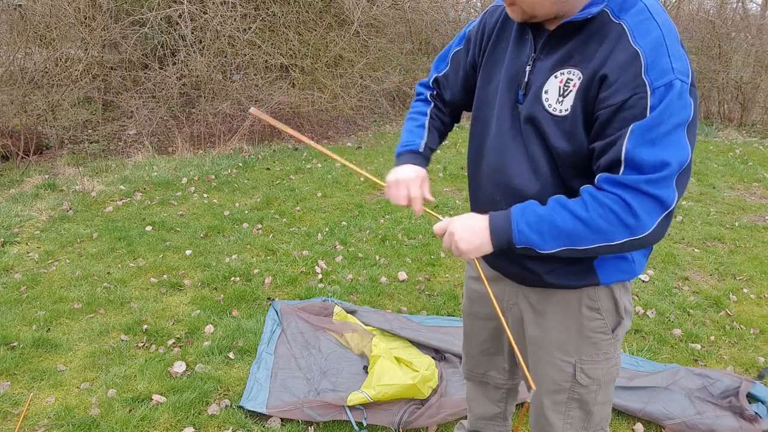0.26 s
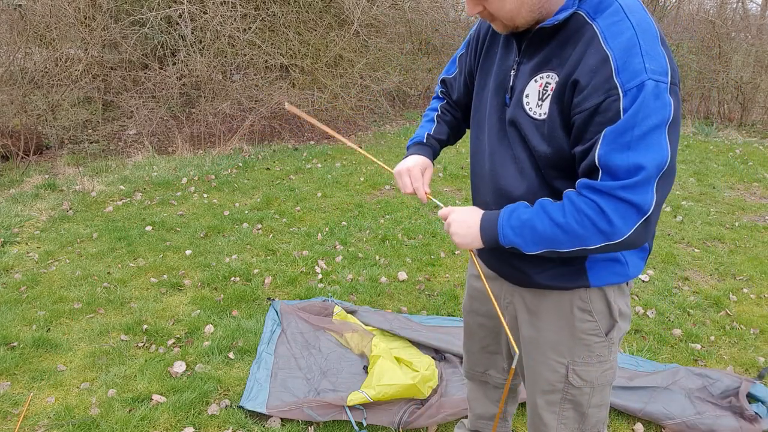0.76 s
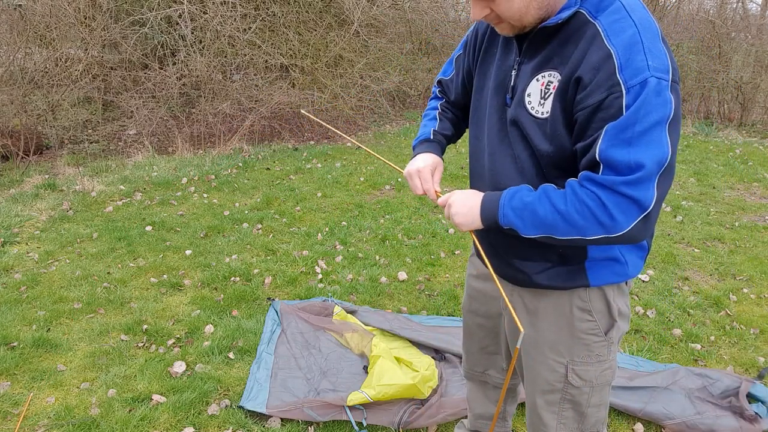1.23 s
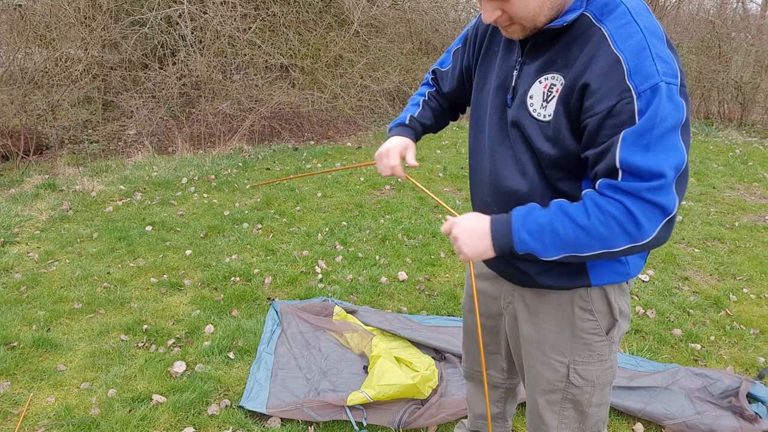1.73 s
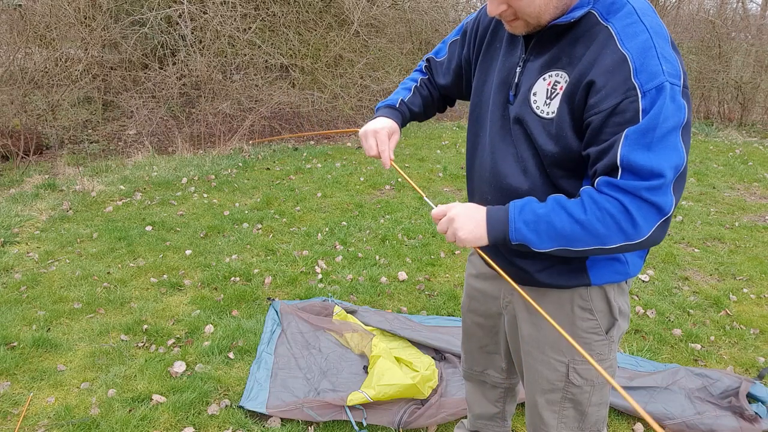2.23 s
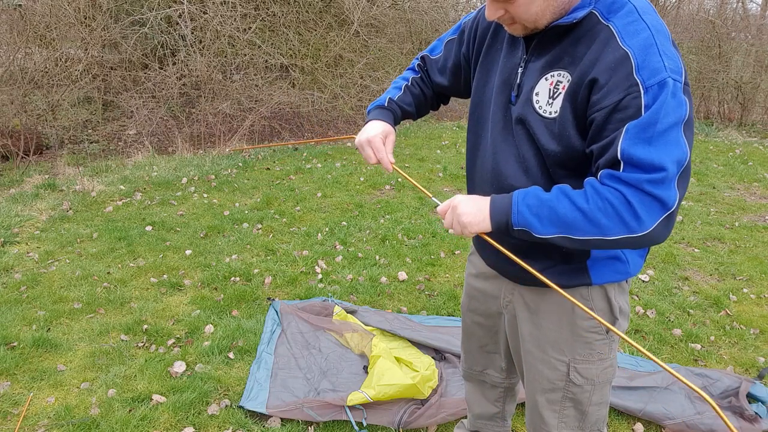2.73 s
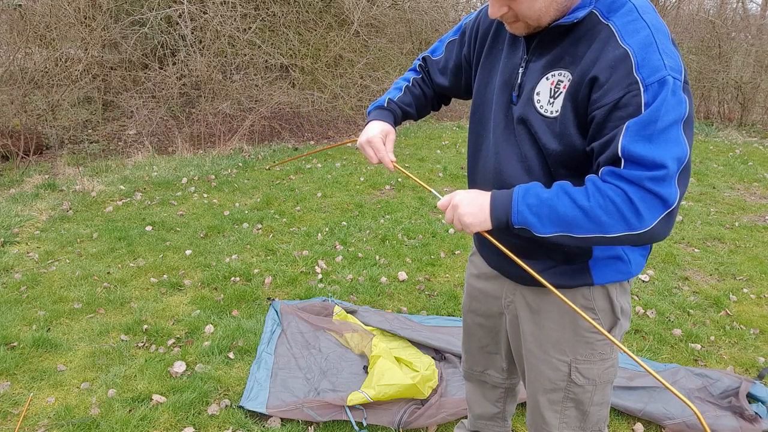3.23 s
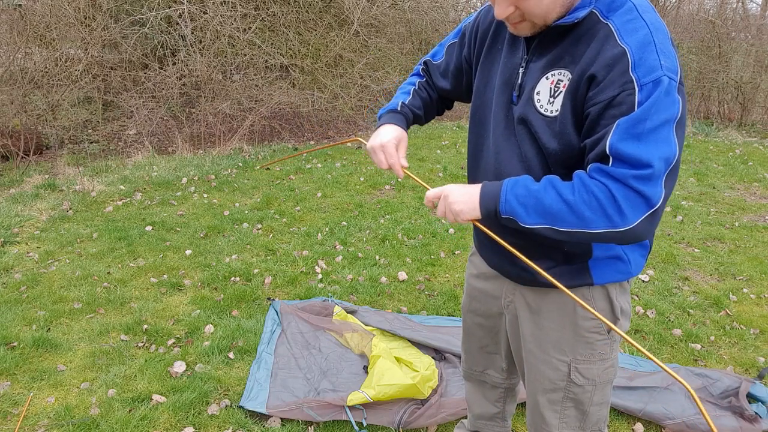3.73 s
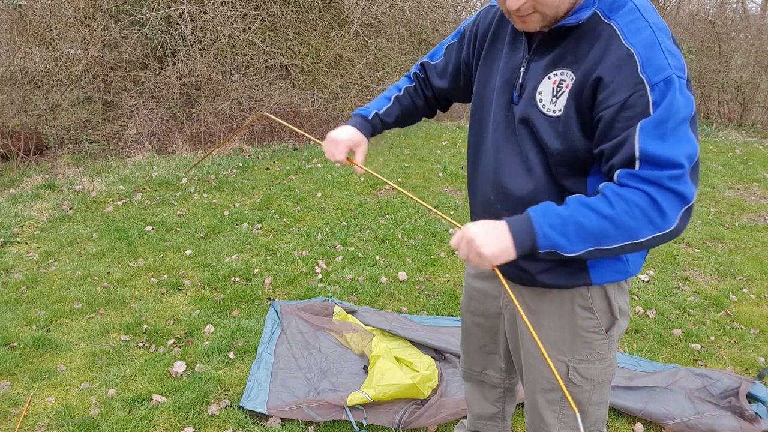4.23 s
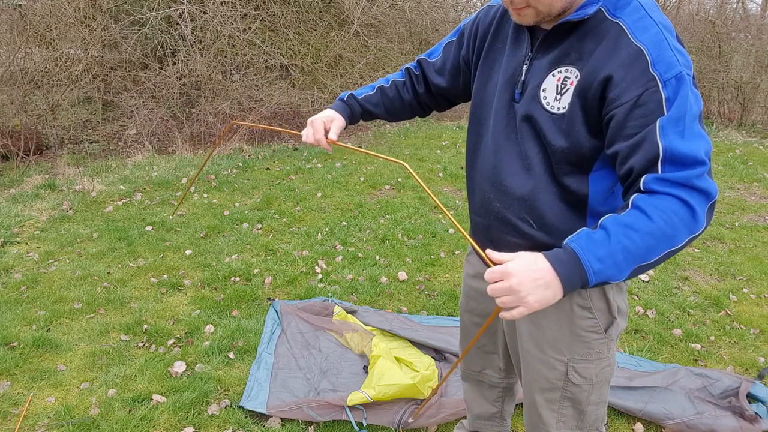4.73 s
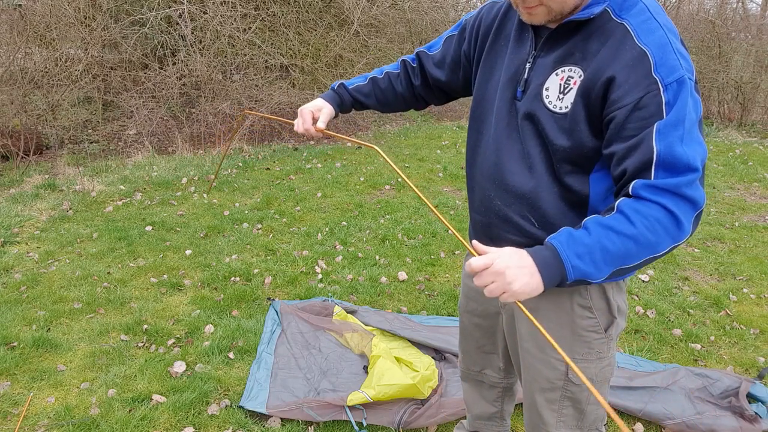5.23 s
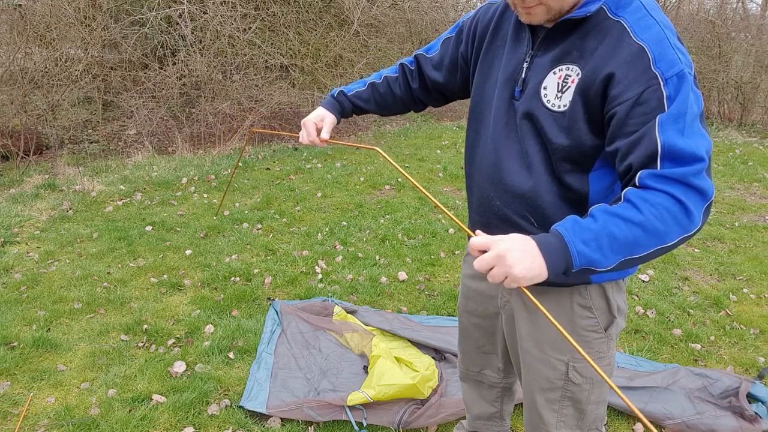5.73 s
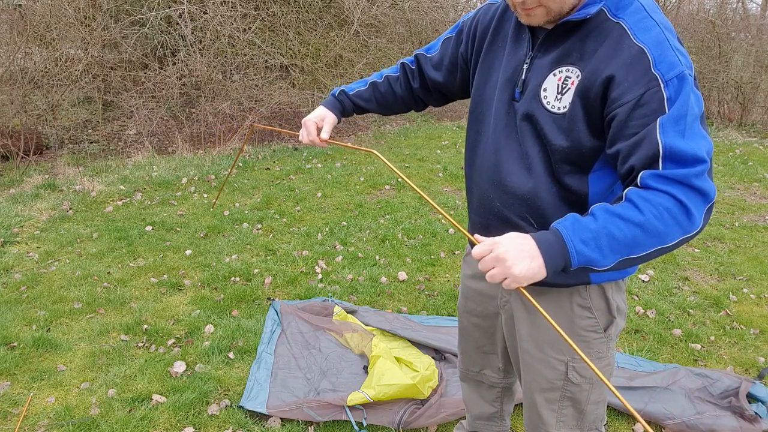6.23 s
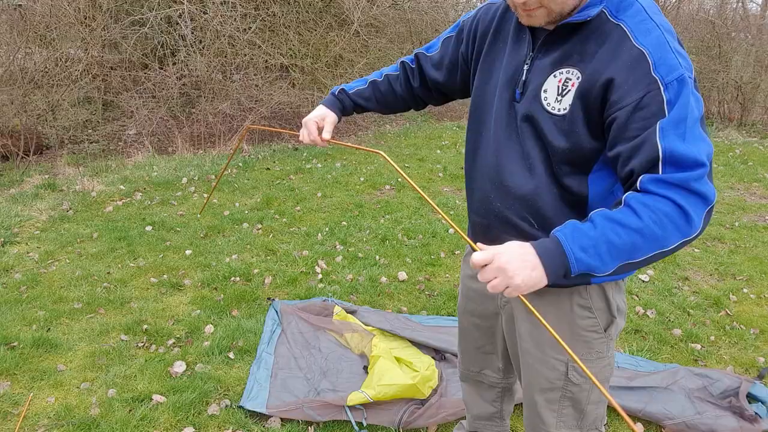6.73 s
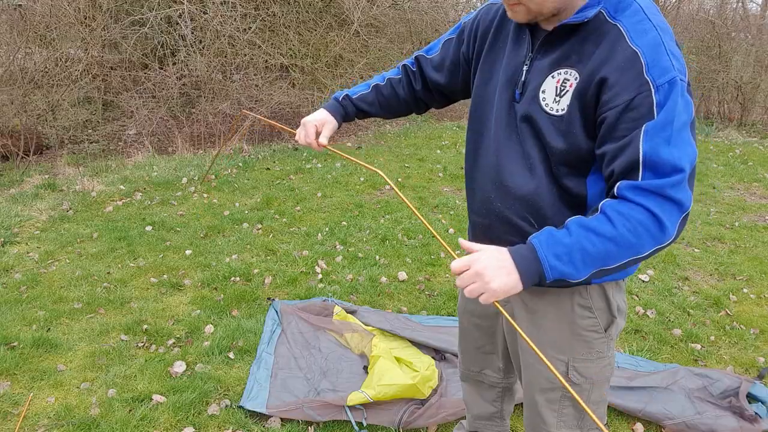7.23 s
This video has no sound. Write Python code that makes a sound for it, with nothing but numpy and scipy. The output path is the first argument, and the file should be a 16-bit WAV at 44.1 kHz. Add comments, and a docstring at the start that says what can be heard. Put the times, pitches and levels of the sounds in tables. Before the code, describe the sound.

On an open lawn beside a hedge, someone slides slim metal tubes together. A sharp early snap leads a flurry of dry ticks and small rattles, followed by isolated taps, a quieter middle and late final clicks. Grainy cloth rustle accompanies the movements. Faint birds chirp and trill behind, with a soft low traffic hum. Close stereo pickup, airy and mostly quiet.

```python
"""Tent pole on a lawn

Sections of a thin aluminium tent pole are slid together: ferrules click, tap and scrape as noise bursts
through short tube modes, each answered by echoes from the lawn and the hedge. Songbirds whistle, buzz and
trill, and others chirp far off, all as gliding sines. Sleeves rustle as grainy hiss, and distant traffic
hums as patchy shaped noise with faint tones. The two microphone ports have different treble resonances."""
import sys
import numpy as np
from scipy import signal
from scipy.fft import rfft, irfft, next_fast_len
from scipy.io import wavfile
from scipy.ndimage import uniform_filter1d, map_coordinates

SR = 44100
rng = np.random.default_rng(int(sys.argv[2]) if len(sys.argv) > 2 else 0)


def master_out(mix):
    """Clip the mix to full scale and print it as 16-bit PCM to the path in sys.argv[1]."""
    frames = np.transpose(np.atleast_2d(mix))
    ceiling = np.clip(frames, -1, 1)
    pcm = np.round(ceiling * 32767).astype(np.int16)
    wavfile.write(sys.argv[1], SR, pcm)


N = 330309


def amp(db):
    """Turn dB into an amplitude factor."""
    return 10 ** (np.asarray(db) / 20)


def unit(x):
    """Scale a sound to an RMS level of 1."""
    return x / np.sqrt(np.mean(x ** 2) + 1e-20)


def along(points, hz):
    """Read a curve of (Hz, value) points, with straight lines on a log frequency axis."""
    f, v = np.transpose(points)
    return np.interp(np.log(hz + 1), np.log(f + 1), v)


def curve(rows):
    """Read a curve of (seconds, value) points at every sample."""
    return np.interp(np.arange(N) / SR, *np.transpose(rows))


def wobble(rate):
    """A smooth random curve with rate random points a second."""
    knots = rng.standard_normal(int(N * rate / SR) + 4)
    return map_coordinates(knots, [np.arange(N) * rate / SR])


def drift(t, rate):
    """A smooth random curve as long as one note."""
    return map_coordinates(rng.standard_normal(int(t[-1] * rate) + 4), [t * rate + 1])


def filtered(x, response):
    """Filter a sound by a (possibly complex) response of frequency."""
    n = x.shape[-1]
    m = next_fast_len(n + 4096)
    return irfft(rfft(x, m) * response(np.fft.rfftfreq(m, 1 / SR)), m)[..., :n]


def band_rms(x, lo_hz, hi_hz):
    """RMS level of one frequency band."""
    return np.std(filtered(x, lambda f: (f > lo_hz) & (f < hi_hz)))


def add(track, sound, s, pan_db):
    """Lay a sound into the stereo track at s seconds; positive pan_db makes the left louder."""
    part = track[:, round(s * SR):][:, :sound.shape[-1]]
    sides = amp([[pan_db / 2], [-pan_db / 2]])
    part += (sound * sides)[:, :part.shape[1]]


def tone(hz):
    """Phase of a gliding pitch: the running sum of its frequency."""
    return 2 * np.pi * np.cumsum(hz) / SR


# Background colour of traffic and far birds. Each row: frequency in Hz, relative level in dB per Hz.
AIR_COLOUR = [(15, -30.5), (25, -14), (70, 1.5), (100, -5), (150, -16.5), (266, -11.5), (358, -19),
              (496, -11), (1060, -15.5), (1880, -16), (5720, -35.5), (7710, -41.5), (8830, -52),
              (14800, -38), (16500, -65.5)]
# Background level over time. Each row: time in seconds, level in dB between 1 and 2.5 kHz.
AIR_LEVEL = [(0, -80), (.9, -84), (1.2, -78.5), (1.77, -76.5), (2.09, -80.5), (4.34, -82), (4.65, -78),
             (6.24, -81), (7.1, -84), (7.49, -83)]
# How alike left and right are. Each row: frequency in Hz, likeness from 0 to 1.
LIKENESS = [(60, 0.84), (240, 0.64), (950, 0), (3770, 0.25), (15000, 0.17)]
# Faint wavering tones. Each row: middle frequency in Hz, middle level in dB.
HUM_TONES = [(50, -76), (100, -83.5), (197, -86), (505, -86)]
# A far narrow whine. Each row: time in seconds, middle level in dB.
WHINE_LEVEL = [(4.3, -100), (4.6, -72.5), (5.5, -82.5), (6.2, -79), (7.2, -82.5), (7.49, -93)]


def air():
    """Patchy noise, most alike at both ports in the bass, with a faint hum and whine in it."""
    z = signal.stft(rng.standard_normal((2, N)), nperseg=512)[2]
    patches = uniform_filter1d(rng.standard_normal(z.shape[1:]), 5, 0)  # smooth across frequency
    patches = uniform_filter1d(patches, 10, 1)  # smooth across time
    pair = signal.istft(z * amp(1.6 * unit(patches)), nperseg=512)[1][:, :N]

    def middle_and_side(f):
        angle = np.arccos(np.clip(along(LIKENESS, f), -1, 1)) / 2  # sets the left-right likeness
        return amp(along(AIR_COLOUR, f)) * [np.cos(angle), np.sin(angle)]

    mid, side = filtered(pair, middle_and_side)
    both = amp(-66.5) * unit(np.array([mid + side, mid - side]))
    low = filtered(both, lambda f: 1 / (1 + (f / 300) ** 4))  # the bass does not follow AIR_LEVEL
    high = both - low
    high = high / band_rms(high.mean(0), 1000, 2500)
    hum = np.zeros(N)
    for hz, db in HUM_TONES:
        level = amp(db + 3 * wobble(5))
        hum += level * np.sin(tone(hz * (1 + .01 * wobble(4))))
    whine = []
    for _ in range(2):  # left and right waver separately
        level = amp(4 * wobble(25))
        whine.append(level * np.sin(tone(1300 + 40 * wobble(30))))
    return low + hum + amp(curve(WHINE_LEVEL)) * np.array(whine) + high * amp(curve(AIR_LEVEL))


def chatter(count):
    """A far flock: short, fluttering, falling notes at random moments, following the air's level."""
    out = np.zeros((2, N))
    u = np.arange(1300) / 1300  # progress through a note, 0 to 1
    for when, pitch, size, fall, side in rng.random((count, 5)):
        hz = (1400 + 2000 * pitch ** 1.5) * (1 - 0.25 * fall * u)
        note = np.sin(np.pi * u) * np.sin(tone(hz))
        add(out, amp(-4 + 5 * size) * note, when * (N - 1) / SR, 12 * side - 6)
    return out * amp(curve(AIR_LEVEL) + 3 * wobble(80))


# Sleeves and cord over time. Each row: time in seconds, level in dB near 6 kHz.
RUSTLE_LEVEL = [(0, -88), (.09, -78.5), (.27, -77.5), (.33, -85.5), (.6, -96), (1.06, -91.5), (1.45, -82),
                (1.66, -83), (1.73, -75.5), (1.96, -94.5), (2.25, -97), (2.42, -82.5), (2.61, -98),
                (3.56, -92), (3.61, -74.5), (3.65, -75), (3.7, -91), (3.97, -95), (4.09, -84.5),
                (4.25, -82), (4.4, -88), (4.63, -86.5), (4.8, -95.5), (5.65, -99), (6.75, -96),
                (6.97, -82.5), (7.1, -94.5), (7.49, -90)]
# Colour of the cloth hiss. Each row: frequency in Hz, relative level in dB per Hz.
CLOTH_COLOUR = [(600, -8), (1500, -4.5), (3000, 4.5), (6000, 1), (8200, -1), (9000, -13), (15000, -13.5),
                (16500, -32)]


def rustle():
    """Cloth friction: hiss broken into uneven grains."""
    grain_level = amp(2.5 * wobble(50) + 2.5 * wobble(250))
    grains = grain_level * rng.standard_normal((2, N))
    hiss = filtered(grains, lambda f: amp(along(CLOTH_COLOUR, f)))
    return amp(curve(RUSTLE_LEVEL)) * hiss / band_rms(hiss.mean(0), 5800, 6500)


def ticks(count):
    """Faint contacts at random moments, denser where the sleeves rustle more; rows as in CONTACTS."""
    busy = np.cumsum(amp(curve(RUSTLE_LEVEL)))
    when, size, side = rng.random((count, 3)).T
    starts = .05 + np.searchsorted(busy, .97 * when * busy[-1]) / SR
    rows = []
    for s, a, b in zip(starts, size, side):
        peak_db = -64 + 4 * (2 * a - 1)
        rows.append((s, peak_db, -14, -10, 8 * b - 6, 2.5, .01))
    return rows


# How fast echoes in the hedge die. Each row: frequency in Hz, seconds to fall 60 dB before scaling.
HEDGE_DECAY = [(500, 0.078), (3000, 0.24), (10000, 0.13)]


def hedge(x, t60_scale, size):
    """Scattered echoes: a noise tail in which each frequency dies at its own speed."""
    hz, t, z = signal.stft(rng.standard_normal((2, size)), SR, nperseg=256)
    t60 = t60_scale * along(HEDGE_DECAY, hz)[:, None]
    tail = signal.istft(z * amp(-60 * t / t60), SR, nperseg=256)[1]
    return signal.fftconvolve(x, tail / np.linalg.norm(tail[0]), axes=1)


def lawn(f, t):
    """Echo response of the ground: two returns, 4.6 and 9.8 ms late, smeared by blades and bumps."""
    echo_db, grass_t60_s = -6.5, 0.012
    returns = amp(echo_db) * np.exp(-2j * np.pi * f * 0.0046)
    returns = returns + amp(echo_db - 11.0) * np.exp(-2j * np.pi * f * .0098)
    grass = amp(-60 * t / grass_t60_s) * rng.standard_normal((2, len(t)))
    return returns * rfft(grass / np.linalg.norm(grass[0]))


# Ferrule contacts. Each row: time in seconds, direct peak in dB between 2 and 6.5 kHz, low knock in dB,
# treble in dB, left-right difference in dB, ring of the tube in dB, seconds to fall 60 dB.
CONTACTS = [(0.0782, -35, -20, -12.5, -4, -3, 0.059), (0.0973, -42, -20, -14, -2, -5, 0.057),
            (0.1441, -23.5, -52, -30, 0, 42, 0.0076), (0.2006, -11, -13, -8.5, 0, 7, 0.02),
            (0.3605, -48.5, -23, -40, 2, -14, 0.006), (0.4277, -25.5, -24.5, -19, -1.5, -4, 0.024),
            (0.4877, -50, -17.5, -21, 1, -17.5, 0.057), (0.503, -55, -15, -10, -0.5, 9, .014),
            (0.5826, -25, -12, -16, 3, -7.5, 0.023), (.817, -49, -31, -19, -4.5, -2.5, 0.013),
            (0.8851, -40.5, -23.5, -19.5, -3.5, -24, 0.018), (0.9826, -38, -5, -19.5, -2, -10, 0.02),
            (1.1692, -21, -19.5, -14.5, -1, 4, 0.02), (1.394, -41.5, -15, -19, -6.5, -20, 0.066),
            (1.414, -21.5, -20, -5.5, 8, 9, 0.013), (1.4174, -23.5, -20.5, -4.5, -6.5, 6, 0.011),
            (1.572, -53, -34, -13, -15, 5, 0.036), (1.5828, -41, -23, -8.5, -3.5, 7, 0.064),
            (1.6162, -45.5, -32, -20, -7, -9, .012), (1.695, -48, -12, -10.5, -9, 13, 0.05),
            (1.7094, -39, -20, -14, -3, -9, 0.083), (1.726, -38, -19, -10, -2.5, 8, 0.097),
            (1.7498, -30.5, -21, -16, -2, -13.5, .018), (1.8528, -38.5, -17.5, -14, -2.5, -2.5, 0.027),
            (2.2527, -34.5, -16.5, -11.5, 1, -9.5, 0.014), (2.277, -49, -17, -35.5, 5, -7.5, 0.034),
            (2.3993, -43, -8, -20, -6, -19, 0.022), (2.472, -48.5, -12, -8, 0, -12, 0.028),
            (2.5165, -48.5, 2, -23, 1, -31, 0.018), (3.1433, -29.5, -11.5, -2, -4, -5, 0.018),
            (3.1472, -26.5, -18.5, -6, 0, -8.5, 0.022), (3.3882, -33.5, -21.5, -5, 2, -19, 0.023),
            (3.4263, -51, -5.5, -39, 2, 0, 0.049), (3.6335, -17, -18.5, -7, 5.5, -1.5, 0.011),
            (3.707, -60.5, -18.5, 0, 3.5, 2, 0.013), (3.919, -45.5, -10.5, -20.5, 3.5, -8, .008),
            (4.0988, -50, -20.5, -2, -10, 4.5, 0.0079), (4.152, -52, -44, -8, -3, 16, 0.03),
            (4.1844, -51, -20, -31, 0, 2, .02), (4.2018, -26.5, -19, -12, -2.5, -2, 0.0068),
            (4.2254, -48, -20, -19, -4, -15, 0.099), (4.2497, -46, -38, -13.5, -1, -7, 0.022),
            (4.2826, -61, -23, 1, 5, 2, .012), (4.3203, -57.5, -22, 8.5, -0.5, 4, 0.011),
            (4.392, -61.5, -23.5, -7.5, -12, 15, .012), (4.459, -49, -10, -25, -9, -8, 0.014),
            (4.495, -54, -1.5, -19.5, -8, -2.5, 0.0092), (4.7361, -55.5, -10.5, -28, -0.5, -4, 0.015),
            (5.1815, -32.5, -9.5, -8.5, -3, 3, 0.011), (5.8522, -32, -4.5, -8.5, -2, 11, 0.011),
            (5.9348, -56, -4, -15, -9.5, 12.5, 0.032), (6.1517, -50, -20.5, -21, -4, -4, 0.013),
            (6.2, -52.5, -8, -20.5, 0, 13, 0.013), (6.226, -31.5, -12, -7, -3.5, 4, .014),
            (6.6586, -43.5, -3, -11, -10, 19, 0.0076), (6.7506, -54, 11, -22, 8, 9, 0.031),
            (6.7643, -37, 10, -10, -1, 2, .014), (6.7667, -23.5, -12.5, -7, -2, 11, 0.0112),
            (7.0467, -20, -6, -6.5, -4, 4, 0.013)]
# Hand-damped tube modes. Each row: frequency in Hz, width in Hz, relative strength in dB.
TUBE_MODES = [(1300, 250, -2), (1740, 250, -2), (2650, 300, -9), (3400, 450, -5), (4200, 350, -8),
              (5150, 500, 2), (6900, 550, -2), (7800, 450, -2), (11000, 900, -2)]
# Basic colour of a contact. Each row: frequency in Hz, relative level in dB per Hz.
SNAP_COLOUR = [(240, -33.5), (500, -2), (1000, 0), (1800, -3), (2500, -5), (3500, -1), (7700, -5),
               (11000, -5), (15300, -5), (16500, -33)]


def ferrules():
    """Each contact is a noise burst through the tube's short modes, with lawn and hedge echoes."""
    out, t, f = np.zeros((2, N)), np.arange(4096) / SR, np.fft.rfftfreq(4096, 1 / SR)
    lead = 44  # samples of room before a burst
    crack_db, crack_share = 4, .45  # first touch: dB over the contact, share of its decay time
    centre, width, level = np.transpose(TUBE_MODES)[:, :, None]
    modes = 1j * f * width / (centre ** 2 - f ** 2 + 1j * f * width)
    low = 1 / (1 + (f / 2500) ** 2)  # the ports hear alike in the low range only
    for s, db, low_db, high_db, pan_db, ring_db, t60 in CONTACTS + ticks(count=16):
        # every blow lands elsewhere on the tube
        strength = amp(ring_db + level + rng.normal(0, 0.87, centre.shape))
        upper_db = 8 + 0.76 * high_db  # the 7 kHz range follows the treble
        tilt = [(600, low_db - 9.5), (1400, low_db), (2500, 0.0066), (6000, 0.01),
                (7700, upper_db), (11000, high_db)]
        colour = (1 + np.sum(strength * modes, 0)) * amp(along(SNAP_COLOUR, f) + along(tilt, f))
        # slow contacts scrape, fast ones snap
        decay = amp(-60 * t / t60) + amp(crack_db - 60 * t / (crack_share * t60))
        attack = 1 - np.exp(-t / (0.051 * t60))
        shape = decay * attack * (t < .045)
        burst = rfft(np.roll(shape * rng.standard_normal((3, len(t))), lead, axis=1))
        blow = colour * (burst[1:] * (1 - low) + burst[0] * low)
        blow = amp(db) * blow / np.abs(irfft(blow * (f > 2000) * (f < 6500))).max()
        heard = irfft(blow * (1 + lawn(f, t)))[:, :2600]
        add(out, heard, s - lead / SR, pan_db)
        add(out, amp(-24.5) * hedge(heard, t60_scale=0.84, size=8000), s + 0.015, pan_db)
        # a faint noise of the same colour swells quickly just before each contact
        swell = unit(irfft(colour * rfft(rng.standard_normal((2, len(t))))))[:, :3000]
        time_left = t[2999::-1]
        add(out, amp(db - 33 - 640 * time_left) * swell, s - 3000 / SR, pan_db)
    return out


# A hand or pole against the body that holds the microphones.
# Each row: time in seconds, level in dB, frequency in Hz, seconds to fall 60 dB.
BODY_THUMPS = [(.202, -47.5, 398.5, 0.013), (1.4, -34.5, 319.2, 0.026), (2.468, -48.5, 690, 0.024),
               (2.479, -50.5, 642, 0.042), (3.432, -62, 652, 0.057), (7.0485, -36.5, 300, 0.0082)]


def thumps():
    """Dull knocks on the body: two damped sines with a band of noise around the lower one."""
    out, t = np.zeros((2, N)), np.arange(4096) / SR
    for s, db, hz, t60 in BODY_THUMPS:
        sines = np.sin(2 * np.pi * hz * t) + .6 * np.sin(2 * np.pi * 1.6 * hz * t)
        noise = filtered(rng.standard_normal(len(t)), lambda f: 1 / (1 + ((f - hz) / (.5 * hz)) ** 4))
        shape = amp(db - 60 * t / t60) * (1 - np.exp(-t / 0.0012))
        add(out, shape * (sines + 4 * noise), s - .002, 0)
    return out


def edges(t, length):
    """Attack, hold and release of a note; the root of 2 makes its dB an RMS level."""
    attack_s, release_s = 0.018, 0.017
    return np.sqrt(2) * np.clip(np.minimum(t / attack_s, (length - t) / release_s), 0, 1)


WAVER_DB, WAVER_HZ = 3, 14  # a note's own unsteadiness
# Whistled notes. Each row: start in seconds, length in seconds, first Hz, last Hz, level at the start
# in dB, swell over the note in dB, left-right difference in dB.
WHISTLED_NOTES = [(0.855, .04, 3400, 3800, -70, 13, 0), (1.072, 0.19, 5290, 5410, -59.5, 3.5, -2),
                  (1.363, 0.15, 4145, 4160, -48.5, -29.5, 2.5), (2.856, 0.035, 2376, 2390, -74, 8.5, -2),
                  (3.446, 0.18, 5410, 4870, -72.5, 4.5, -7), (3.863, 0.14, 3520, 4310, -70, 14, -0.5),
                  (4.152, 0.14, 3435, 4380, -62, 3, 2.5), (5.517, 0.13, 5080, 4480, -71.5, -13, 7.8),
                  (6.078, .04, 4000, 4440, -82.5, 4.5, -7), (6.108, 0.034, 4600, 4680, -70, 0, -6),
                  (6.132, 0.081, 4340, 3460, -68.5, -16, -3), (6.176, .2, 4570, 4595, -57, -37, 3),
                  (6.646, .1, 4780, 4560, -74, 4, -7.5), (6.871, 0.13, 3470, 3720, -71, -3, -6),
                  (7.102, .07, 4540, 4350, -61, -20.5, -0.5)]


def whistles():
    """Unsteady sines whose glide is fastest at its start."""
    out = np.zeros((2, N))
    for s, length, from_hz, to_hz, db, swell_db, pan_db in WHISTLED_NOTES:
        t = np.arange(0, length, 1 / SR)
        bend = .85 if to_hz > from_hz else 0.38  # rising or falling
        pitch = from_hz + (to_hz - from_hz) * (t / length) ** bend + WAVER_HZ * drift(t, 33)
        level = amp(db + swell_db * t / length + WAVER_DB * drift(t, 40))
        add(out, edges(t, length) * level * np.sin(tone(pitch)), s, pan_db)
    return out


# Short, mostly falling chirps. Each row: start in seconds, length in seconds, first Hz, last Hz, peak in dB.
CHIRP_NOTES = [(0.902, 0.063, 4160, 3010, -67.5), (1.249, .015, 1770, 1660, -68.5),
               (1.761, .03, 1292, 1240, -62.5), (2.101, 0.031, 1840, 1787, -71.5),
               (2.498, 0.021, 6600, 6360, -63), (2.696, 0.043, 1400, 1267, -71.5),
               (2.729, 0.03, 2380, 2050, -66), (2.746, 0.038, 1823, 1500, -64),
               (2.754, 0.057, 2460, 2174, -67), (2.784, .02, 1700, 1680, -70.5),
               (3.548, 0.021, 2390, 2260, -68), (3.558, 0.019, 1670, 1490, -65),
               (3.705, 0.049, 2450, 2220, -71), (4.063, 0.014, 2550, 1870, -65),
               (4.33, 0.021, 2870, 1740, -68), (4.63, 0.025, 2970, 1950, -69.5),
               (4.989, 0.035, 3480, 3150, -68), (4.991, 0.029, 1806, 1505, -60),
               (4.996, 0.024, 2910, 2360, -58), (5.013, 0.02, 2110, 1863, -53.5),
               (4.755, 0.055, 3160, 3170, -73.5), (5.06, 0.024, 2040, 1970, -68),
               (5.373, 0.023, 2800, 2570, -60.5), (5.394, 0.018, 2790, 2400, -64.5),
               (5.396, .024, 2070, 1560, -58), (5.417, 0.017, 2820, 2484, -67),
               (5.431, 0.035, 1940, 1655, -68), (5.435, 0.041, 4190, 3930, -67.5),
               (5.459, 0.03, 1963, 1870, -71), (6.222, 0.034, 3440, 2820, -68),
               (7.116, .04, 3500, 2970, -74.5)]


def chirps():
    """Short sine glides that swell and fade in one arch."""
    out = np.zeros((2, N))
    for s, length, from_hz, to_hz, db in CHIRP_NOTES:
        u = np.arange(round(length * SR)) / (length * SR)
        pitch = from_hz + (to_hz - from_hz) * u ** 1.3
        add(out, amp(db) * np.sin(np.pi * u) ** 0.91 * np.sin(tone(pitch)), s, -3.5)
    return out


# Falling sweeps of two trills, the later one in two voices.
# Each row: start in seconds, top Hz, bottom Hz, peak in dB, left-right difference in dB.
TRILL_SWEEPS = [(2.315, 8200, 6850, -81, -13), (2.349, 7960, 6720, -65, -14),
                (2.383, 8170, 7000, -52.5, -14), (2.42, 8000, 6960, -55.5, -12),
                (2.456, 8240, 7440, -49, -12), (2.495, 8340, 7600, -56.5, -12),
                (2.532, 8000, 7650, -73, -10), (5.961, 7080, 6800, -74.5, -8),
                (5.998, 7160, 6670, -70.5, -7.5), (6.04, 7250, 6750, -71.5, -11),
                (6.073, 7330, 6630, -71.5, -8), (6.116, 7330, 6630, -66, -13), (6.158, 7100, 6600, -71, -6),
                (6.039, 7760, 7160, -77.5, -13), (6.078, 7920, 7500, -76.5, -15),
                (6.128, 8060, 7330, -70.5, -13.5), (6.168, 8100, 7450, -79, -13)]


def trills():
    """Quick rows of high sines, each falling along an S-shaped pitch curve."""
    out, sweep_s = np.zeros((2, N)), 0.036
    u = np.arange(round(sweep_s * SR)) / (sweep_s * SR)
    for s, top_hz, bottom_hz, db, pan_db in TRILL_SWEEPS:
        pitch = top_hz + (bottom_hz - top_hz) * (1 - np.cos(np.pi * u ** 1.26)) / 2
        add(out, amp(db) * np.sin(np.pi * u) ** 0.86 * np.sin(tone(pitch)), s, pan_db)
    return out


# Buzzed notes. Each row: start in seconds, length in seconds, centre Hz, height of the pitch arch in Hz,
# level at the start in dB, left-right difference in dB.
BUZZED_NOTES = [(5.941, .12, 3787, 30, -56, -1.5), (6.416, .15, 3734, 130, -59, -1.5),
                (7.228, .05, 3720, 50, -68, -1.5)]


def buzzes():
    """Sines with a very fast vibrato; the pitch scoops up, arches and settles."""
    out = np.zeros((2, N))
    vibrato_hz, vibrato_depth_hz, scoop_hz, scoop_s, fade_db = 174.6, 150, 250, 0.012, -7.5
    for s, length, hz, arch_hz, db, pan_db in BUZZED_NOTES:
        t = np.arange(0, length, 1 / SR)
        depth = vibrato_depth_hz * amp(WAVER_DB * drift(t, 42.7))
        vibrato = depth * np.sin(tone(vibrato_hz + WAVER_HZ * drift(t, 55)))
        arch = arch_hz * np.sin(np.pi * (t / length) ** 0.59)
        pitch = hz - scoop_hz * np.exp(-t / scoop_s) + arch + vibrato
        level = amp(db + fade_db * t / length)
        add(out, edges(t, length) * level * np.sin(tone(pitch)), s, pan_db)
    return out


def birds():
    """All birds: moving air makes the notes flutter, and the hedge blurs those below 3 kHz most."""
    out = chatter(count=420) + whistles() + buzzes() + chirps() + trills()
    out = out * amp(3 * np.array([wobble(90), wobble(90)]))
    echo = hedge(out, t60_scale=1.3, size=20000)[:, :N]
    echo_db = [(2900, 1), (3500, -9), (6000, -8), (7000, -3)]  # (Hz, dB)
    return out + filtered(echo, lambda f: amp(along(echo_db, f)))


def scene():
    """Poles, birds, cloth and the open air."""
    return ferrules() + thumps() + birds() + rustle() + air()


# Microphone ports, left then right. Each row: resonance in Hz, width in Hz, strength in dB.
PORT_RESONANCES = [(11000, 1200, 1), (7680, 2000, 0)]


def record(dry):
    """Each port lifts its own treble band; nothing passes above the band limit."""
    top_hz = 16650

    def ports(f):
        return np.array([1 + amp(db) * 1j * f * width_hz / (hz * hz - f * f + 1j * f * width_hz)
                         for hz, width_hz, db in PORT_RESONANCES])

    return filtered(dry, lambda f: ports(f) * (f < top_hz))


dry = scene()
out = record(dry)
master_out(out)
```